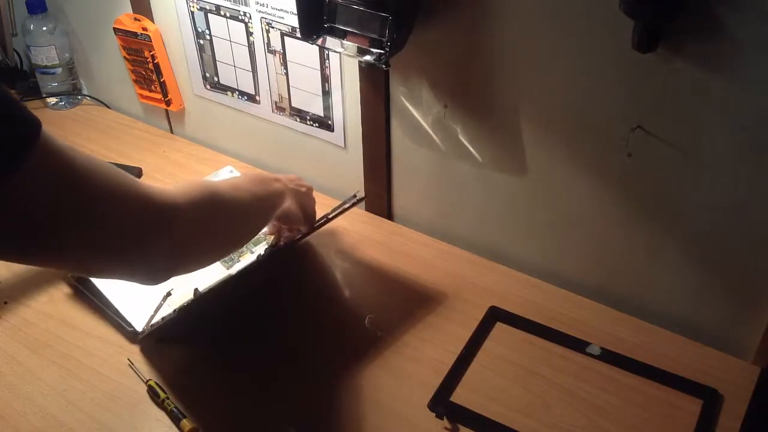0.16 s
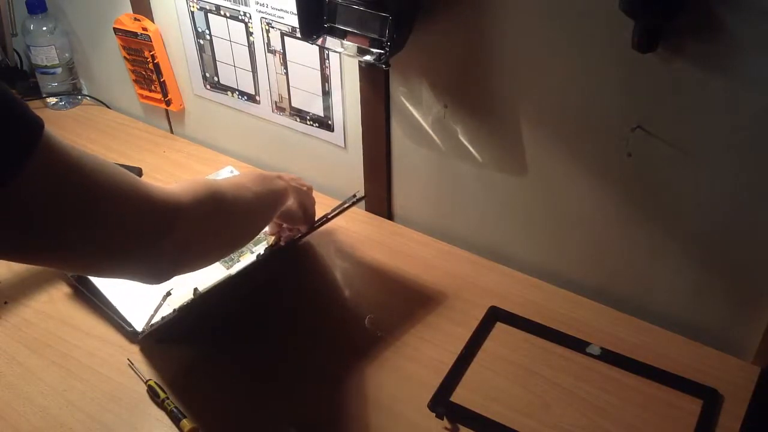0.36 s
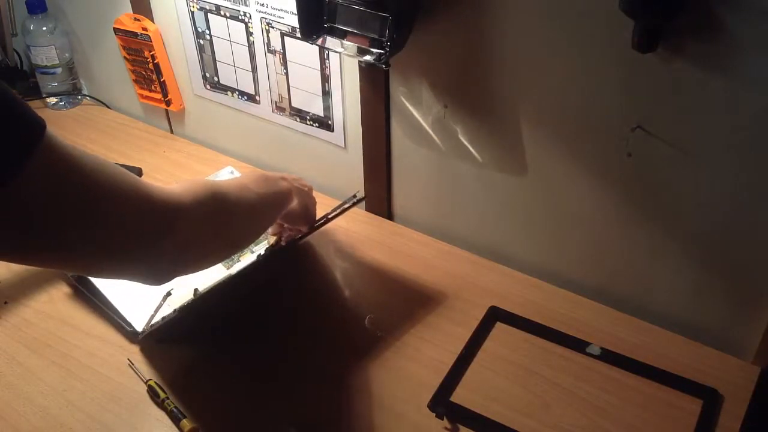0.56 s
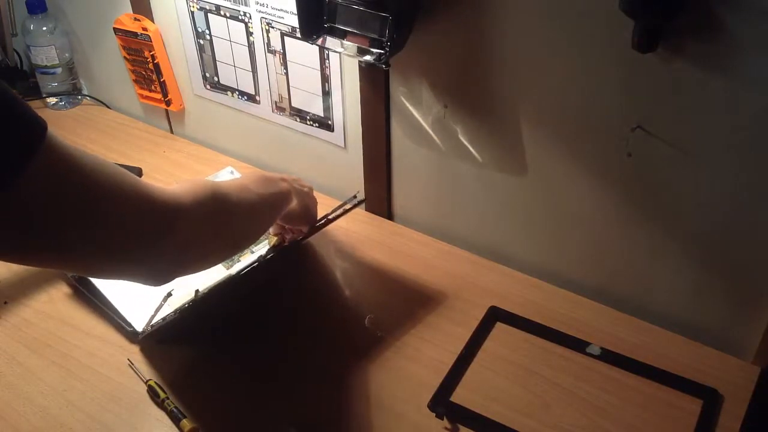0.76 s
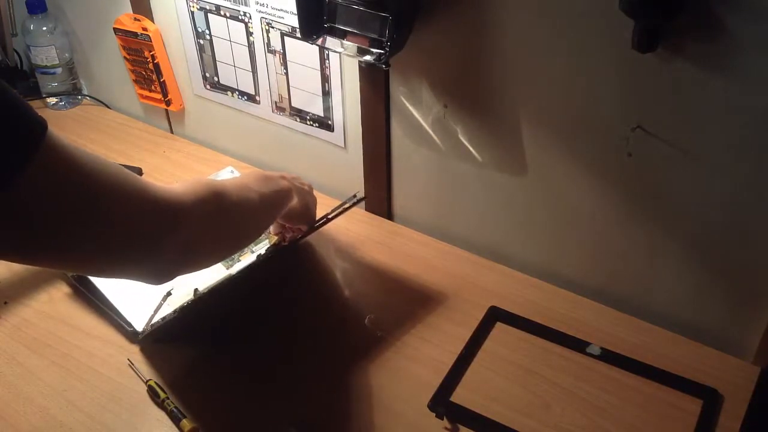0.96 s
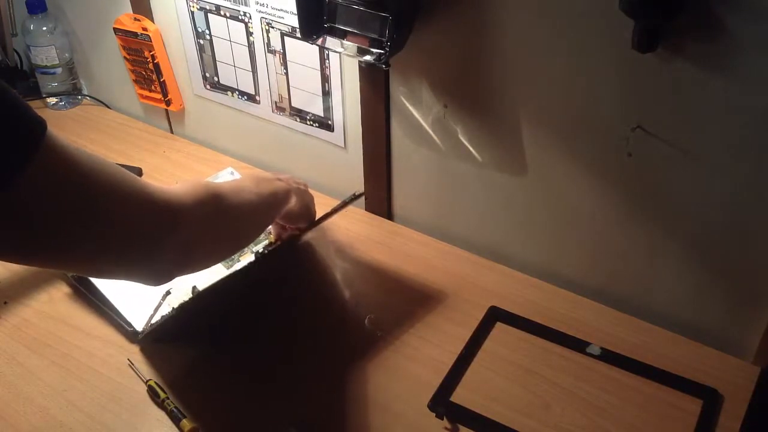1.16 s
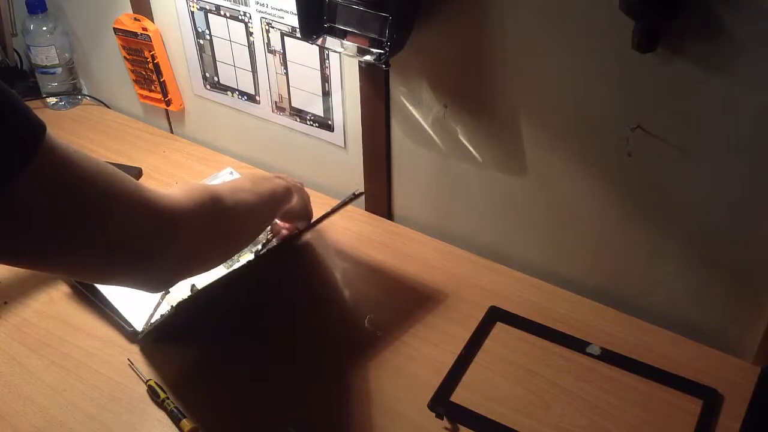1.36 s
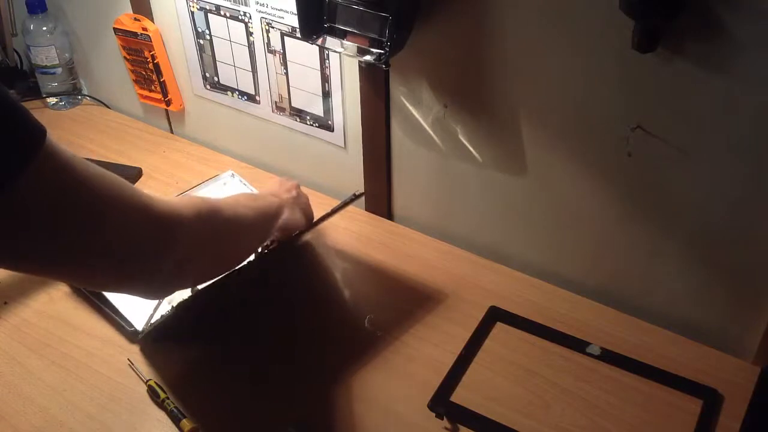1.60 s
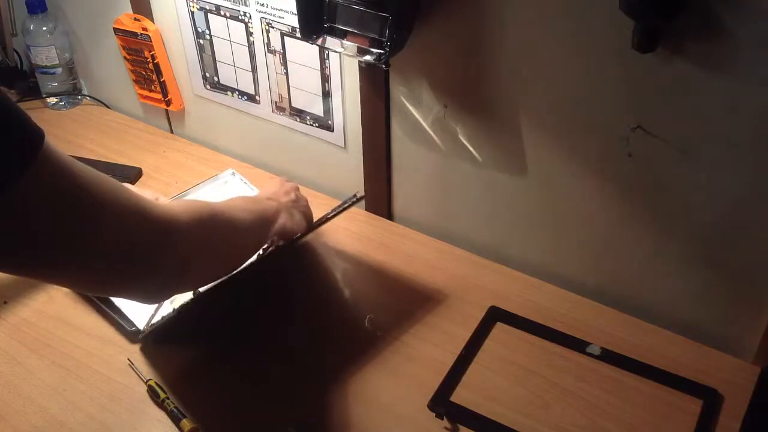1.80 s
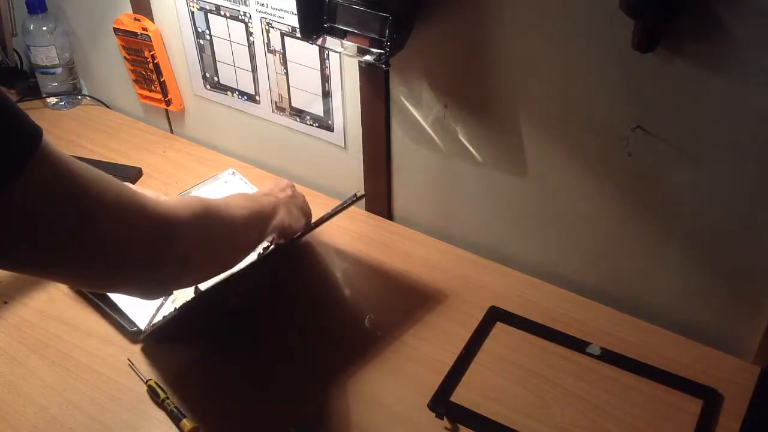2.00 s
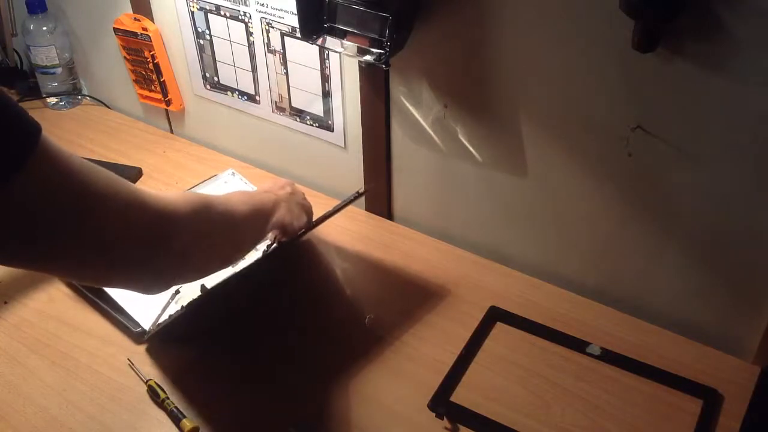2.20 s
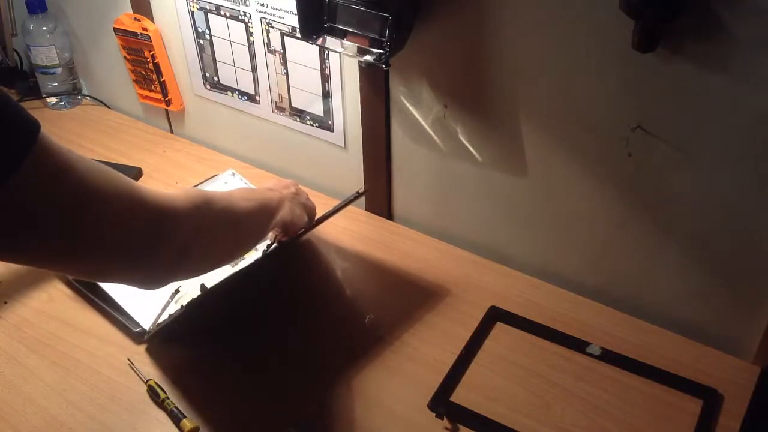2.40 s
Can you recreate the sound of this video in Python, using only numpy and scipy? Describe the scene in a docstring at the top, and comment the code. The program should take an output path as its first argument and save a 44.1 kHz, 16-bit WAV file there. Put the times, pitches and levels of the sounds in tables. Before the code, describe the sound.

Irregular snaps of tape and plastic on a thin screen panel. A light knock with a quick bounce opens at 0 s, a snap follows at 0.23, then the strongest at 0.43 and 0.69 over a low sliding rumble and rustle. Smaller clicks come around 0.9-1.0, dull nail ticks and faint scuffs at 1.2-1.5, a sharp snap at 1.59, and weak clicks until 1.93. Small-room echo, faint hiss.

```python
"""On a wooden workbench, fingers pick tape and a small plug off the back of a laptop screen.
Each snap is a few milliseconds of noise for tiny fractures, echoed by a wall and then by a small room.
A light knock with a bounce rings the thin panel, which rumbles and rustles as hand and panel slide.
Fingertip scuffs are swells of stick-slip pulses, and fingernail ticks are short, dull rings.
Faint filtered noise lies underneath as room tone and microphone hiss."""
import sys
import numpy as np
from scipy import signal
from scipy.fft import rfft, irfft
from scipy.io import wavfile

SR = 44100
rng = np.random.default_rng(int(sys.argv[2]) if len(sys.argv) > 2 else 0)


def master(y):
    """Save y as 16-bit WAV."""
    cut = np.clip(np.atleast_2d(y).T, -1, 1)
    pcm = np.round(cut * 32767)  # scale
    wavfile.write(sys.argv[1], SR, pcm.astype(np.int16))


N = 108045  # length in samples
T = np.arange(N) / SR  # time of each sample, in seconds
FREQS = np.maximum(np.arange(N // 2 + 1) * SR / N, 1)  # frequency axis in Hz, kept above 0 for the logs


def amp(db):
    """Turn decibels into a gain."""
    return 10 ** (np.asarray(db) / 20)


def unit(x):
    """Scale to an rms of 1."""
    return x / np.sqrt(np.mean(x ** 2))


def over_hz(points):
    """Join (Hz, value) points on a log-frequency axis."""
    hz, value = np.array(points, float).T
    return np.interp(np.log(FREQS), np.log(hz), value)


def over_time(points):
    """Join (seconds, dB) points into a gain curve."""
    seconds, db = np.array(points, float).T
    return amp(np.interp(T, seconds, db))


def colour(x, db):
    """Filter with a gain in dB at every frequency; minimum phase, so nothing sounds early."""
    size = 2048
    grid = np.linspace(0, SR / 2, size // 2 + 1)
    cepstrum = irfft(np.log(amp(np.interp(grid, FREQS, db))))
    # folding the cepstrum onto positive times makes the filter causal
    cepstrum[1:size // 2] *= 2
    cepstrum[size // 2:] = 0
    response = irfft(np.exp(rfft(cepstrum)))
    return signal.oaconvolve(np.atleast_2d(x), response[None])[:, :N].squeeze()


def resonate(x, modes):
    """Sum of resonances (Hz, width in Hz, dB), each struck by x; every second one is flipped in sign."""
    total = 0
    for k, (hz, width, db) in enumerate(modes):
        ring = signal.lfilter(*signal.iirpeak(hz, hz / width, fs=SR), x)
        total = total + (-1) ** k * amp(db) * ring
    return total


def ripple(count):
    """Random hills and valleys across the spectrum."""
    return np.interp(FREQS, np.linspace(0, SR / 2, count), rng.standard_normal(count))


def hill(hz, octaves):
    """A bell-shaped rise in the spectrum, of height 1."""
    return np.exp(-.5 * (np.log2(FREQS / hz) / octaves) ** 2)


def click(start):
    """A single impulse, one sample long."""
    return np.maximum(1 - np.abs(np.arange(N) - np.round(start * SR)), 0)


FRACTURE_DB, RISE_SHARE = 4.5, 0.15  # unevenness of the fractures; share of the length spent building up


def burst(start, length_ms, decay_ms):
    """A noise cluster of tiny fractures that builds up, holds and dies away; energy 1."""
    ms = (T - start) * 1000
    unevenness = np.repeat(rng.standard_normal(N), 12)[:N]  # a new level every 12 samples
    fractures = rng.standard_normal(N) * amp(FRACTURE_DB * unevenness)
    rise = np.clip(ms / (RISE_SHARE * length_ms + 1e-9), 0, 1)
    decay = np.exp(-np.maximum(ms - length_ms, 0) / decay_ms)
    x = fractures * rise * decay
    return x / np.sqrt(np.sum(x ** 2))


SLIPS_PER_S, SLIP_SCATTER_DB = 1600, 3  # average rate; spread of the pulse levels


def slips():
    """Surfaces stick and slip: dense pulses at random times, with random signs and uneven levels."""
    happens = rng.random(N) < SLIPS_PER_S / SR
    return happens * rng.choice([-1, 1], N) * amp(SLIP_SCATTER_DB * rng.standard_normal(N))


# How long the room rings. Each row: frequency in Hz, time to fall by 60 dB in seconds.
ROOM_DECAY = [(300, 0.11), (1300, .33), (8000, 0.29), (15000, 0.23)]
ROOM_ONSET_MS = 6.7  # time for the tail to build up


def room(x):
    """Small-room tail, decaying noise whose bass dies first and whose middle lasts longest."""
    noise, response = rfft(rng.standard_normal(N)), 0
    for hz, t60 in ROOM_DECAY:
        band = over_hz([(f, f == hz) for f, _ in ROOM_DECAY])
        response = response + irfft(noise * band, N) * np.exp(-np.log(1000) * T / t60)
    response = response * np.minimum(T * 1000 / ROOM_ONSET_MS, 1) ** 2
    response = response / np.sqrt(np.sum(response ** 2))  # energy 1
    return signal.fftconvolve(x, response)[:N]


# Colour of the room tone and microphone hiss. Each row: frequency in Hz, relative level in dB per Hz.
HISS_COLOUR = [(75, -8), (100, -4.5), (130, -6), (190, -3), (310, -4), (900, -9.5), (1500, -21.5),
               (3200, -12.5), (15000, -13)]
HISS_DB = -63.5


def hiss():
    """Room tone and microphone hiss: steady random noise, shaped in frequency."""
    noise = irfft(rfft(rng.standard_normal(N)) * amp(over_hz(HISS_COLOUR)), N)
    return amp(HISS_DB) * unit(noise)


# A light knock on the panel and its bounce. Each row: start in seconds, relative level in dB.
KNOCK_BLOWS = [(.001, 1), (.016, -12)]
# How the panel rings under a knock. Each row: frequency in Hz, width in Hz, relative level in dB.
KNOCK_RINGS = [(810, 200, -10.5), (1010, 91, -5), (1130, 63, -5.5), (1215, 28, -2), (2170, 72, -13)]
KNOCK_DB, KNOCK_TICK_DB, KNOCK_ROOM_DB = 3, -16.5, -1  # gain of the ring, the contact tick, the room
KNOCK_TICK_MS, KNOCK_BAND_HZ = 5.7, (280, 15400)  # decay of the tick; frequencies kept


def knock():
    """Impulses set the panel's modes ringing into the room, with a noisy tick at each contact."""
    blows = sum(amp(db) * click(start) for start, db in KNOCK_BLOWS)
    contacts = sum(amp(db) * burst(start, 0, KNOCK_TICK_MS) for start, db in KNOCK_BLOWS)
    tick = amp(KNOCK_TICK_DB) * contacts
    ring = amp(KNOCK_DB) * resonate(blows, KNOCK_RINGS)
    echo = amp(KNOCK_ROOM_DB) * room(ring + amp(KNOCK_TICK_DB) * blows)
    return signal.lfilter(*signal.butter(1, KNOCK_BAND_HZ, "band", fs=SR), tick + ring + echo)


# Snaps of tape and plastic. Each row: start in seconds, relative level in dB, tearing length in ms,
# frequency in Hz below which the sound thins out, boost of the body in dB, boost of the top in dB,
# broad ring in Hz, its height in dB, sharp ring in Hz, level sent to the room in dB.
SNAP_EVENTS = [(.234, -7, 1.5, 2870, 7, 8, 5550, 11, 2980, -1),
               (0.432, 3.5, 3.4, 202, 1.5, 5.5, 10000, 3, 6780, -1),
               (.689, 5.5, 4.45, 310, 1, 5, 11000, -0.5, 4900, 1.5),
               (0.9059, -21.5, 0.59, 300, 6.5, 0, 6700, 3.5, 6700, 1.5),
               (.9206, -25, 1.5, 595, 19.5, -5, 4230, 10, 3020, 1),
               (1.0235, -12.5, 2.9, 407, 11.5, -1, 6200, 4.5, 2110, 3.5),
               (1.3299, -24.5, 3.1, 300, 13.5, -6, 3200, 2, 3260, -6),
               (1.3379, -10.5, 1.8, 300, -4.5, -6.5, 5950, -0.5, 6020, 0),
               (1.5074, -33, .28, 1990, 4, 2.5, 6000, 1.5, 5900, -2),
               (1.557, -16, 0.98, 1800, -4, -14, 7250, -0.5, 3480, 0.5),
               (1.578, -30.5, 5.9, 980, 14.5, 7, 8500, -3, 6800, 9.5),
               (1.591, -2.5, 3.1, 252, -5, -5, 4940, 3, 3910, -0.5),
               (1.7983, -17.5, 1.1, 2020, -3, 3.5, 4700, -3, 6860, 0),
               (1.839, -25.5, 1.4, 2600, 13, -13, 5440, 6, 6660, 1.5),
               (1.929, -36, .6, 3000, 3, 6, 12500, 2, 14000, -5)]
# Colour shared by all the snaps. Each row: frequency in Hz, relative level in dB.
SHARED_COLOUR = [(300, -9.5), (1100, -15.5), (2000, -13), (2800, -6.5), (4300, -9.5), (6000, -1.5),
                 (7600, -0.5), (8700, 1.5), (12200, -2.5), (13000, -3.5), (15000, -8.5), (16000, -10)]
# How the panel rings on after a snap. Each row: frequency in Hz, width in Hz, relative level in dB.
SNAP_RINGS = [(655, 37, 9), (2066, 35, 5.5), (2670, 30, -2)]
# Sharp rings of the plastic plug and frame. Each entry: frequency in Hz.
PLASTIC_HZ = [6750, 8270, 8640, 9720, 10200, 12600]
PLASTIC_WIDTH_HZ, PLASTIC_DB = 19, -7.5
BODY_HZ, TOP_SHELF_HZ = (1800, 6050), (8500, 12500)  # where the body fades out and the top fades in
RING_OCTAVES, SHARP_OCTAVES, SHARP_DB = 0.24, 0.034, 7.5  # spread of each ring; height of the sharp one
SNAP_DECAY_MS, RIPPLE_DB = 0.64, 1.2
WALL_MS, WALL_DB = 3.45, -3.5  # lag and level of the echo from the wall behind the bench


def snaps():
    """Tape and plug let go in coloured bursts of fractures; wall, room, panel and plastic answer."""
    body = over_hz([(BODY_HZ[0], 1), (BODY_HZ[1], 0)])
    top = over_hz([(TOP_SHELF_HZ[0], 0), (TOP_SHELF_HZ[1], 1)])
    shared, near, spread = over_hz(SHARED_COLOUR), 0, 0
    for start, db, length, low_hz, body_db, top_db, ring_hz, ring_db, sharp_hz, room_db in SNAP_EVENTS:
        rings = ring_db * hill(ring_hz, RING_OCTAVES) + SHARP_DB * hill(sharp_hz, SHARP_OCTAVES)
        low_cut = np.maximum(-10 * np.log10(1 + (low_hz / FREQS) ** 12), -15)  # at most 15 dB down
        tone = db + shared + low_cut + body_db * body + top_db * top + rings
        tone = tone + RIPPLE_DB * ripple(count=90)
        tear = burst(start, length, SNAP_DECAY_MS)
        wall_echo = amp(WALL_DB) * burst(start + WALL_MS / 1000, length, SNAP_DECAY_MS)
        to_room = amp(room_db) * click(start)
        direct, sent = colour(np.array([tear + wall_echo, to_room]), tone)
        near, spread = near + direct, spread + sent
    plastic = [(hz, PLASTIC_WIDTH_HZ, PLASTIC_DB) for hz in PLASTIC_HZ]
    return near + room(spread) + room(resonate(spread, SNAP_RINGS + plastic))


# Rumble as hand and panel slide. Each row: time in seconds, level in dB.
SLIDE_LEVEL = [(.29, -85), (.315, -58), (.362, -47), (.425, -41.5), (.515, -50), (.535, -44.5), (.68, -54),
               (.775, -54), (.795, -63.5), (1.13, -72.5), (1.195, -56.5), (1.25, -66.5), (1.6, -65.5),
               (2.0, -79.5), (2.115, -64), (2.3, -76)]
# Resonances of the panel on the bench. Each row: frequency in Hz, width in Hz, relative level in dB.
PANEL_RINGS = [(207, 44, 1), (249.3, 18, 5.5), (295.6, 41, 3), (392, 24.7, -1.5), (470, 17.4, 0.5),
               (666, 360, -14)]
# Rustle of skin on the panel. Each row: time in seconds, level in dB.
RUSTLE_LEVEL = [(.28, -69), (.365, -50.5), (.51, -52), (.67, -63.5), (.76, -56), (.81, -70), (1.18, -65.5),
                (1.24, -70.5), (1.39, -62), (1.5, -69), (2.3, -69.5)]
# Colour of the rustle. Each row: frequency in Hz, relative level in dB.
RUSTLE_TONE = [(80, -32), (250, -20), (550, -8), (850, -2), (1200, -5), (1900, -4), (3000, -12.5),
               (12000, -27)]
PANEL_LOW_HZ = 128  # the rumble is cut below this


def sliding():
    """Stick-slip shakes the panel's low resonances while skin rustles over its face."""
    low_cut = signal.butter(4, PANEL_LOW_HZ, "high", fs=SR, output="sos")
    rumble = signal.sosfilt(low_cut, resonate(slips(), PANEL_RINGS))
    rustle = colour(slips() + slips(), over_hz(RUSTLE_TONE))
    return unit(rumble) * over_time(SLIDE_LEVEL) + unit(rustle) * over_time(RUSTLE_LEVEL)


# Short scuffs of a fingertip. Each row: middle in seconds, level at the peak in dB,
# time from the peak until it is about 17 dB down in seconds, centre in Hz, width in Hz.
FINGER_SCUFFS = [(1.172, -66, .03, 694, 500), (1.537, -65.5, 0.026, 950, 350)]


def scuffs():
    """A fingertip shifts its grip: brief swells of stick-slip in one resonance."""
    out = 0
    for middle, db, length, hz, width in FINGER_SCUFFS:
        swell = np.exp(-2 * ((T - middle) / length) ** 2)
        out = out + amp(db) * swell * unit(resonate(slips(), [(hz, width, 0)]))
    return out


# Fingernail ticks on the frame. Each row: start in seconds, relative level in dB, pitch in Hz,
# width in Hz of the narrower of two resonances.
NAIL_TICKS = [(1.2688, -24.5, 2760, 900), (1.309, -18, 3020, 795), (1.3963, -23, 1870, 1000)]
TICK_MS, TICK_EDGE_DB, TICK_ROOM_DB = 3.6, -18, -1.5  # decay; bright edge of the contact; room


def ticks():
    """A fingernail catches the frame: a dull, quickly damped ring with a bright edge."""
    out = 0
    for start, db, hz, width in NAIL_TICKS:
        contact = amp(db) * burst(start, 0, TICK_MS)
        ring = resonate(resonate(contact, [(hz, width, 0)]), [(hz, 2 * width, 0)])
        out = out + ring + amp(TICK_EDGE_DB) * contact
    return out + amp(TICK_ROOM_DB) * room(out)


def scene():
    """Knock, snaps, sliding, scuffs and ticks over the hiss, as one channel."""
    return (hiss() + knock() + snaps() + sliding() + scuffs() + ticks())[None]


def record(dry):
    """The microphone loses the deep bass and cuts the top."""
    low_cut = signal.butter(4, 85, "high", fs=SR, output="sos")
    top_cut = signal.ellip(10, .2, 70, 15200, fs=SR, output="sos")  # steep, above 15200 Hz
    return signal.sosfilt(top_cut, signal.sosfilt(low_cut, dry))


dry = scene()
out = record(dry)
master(out)
```